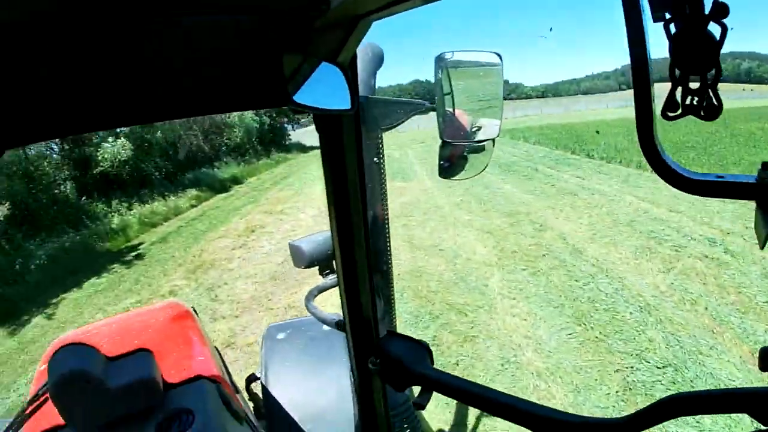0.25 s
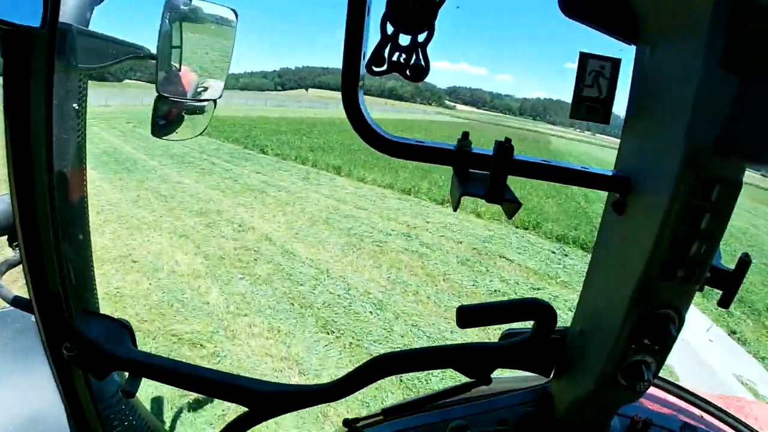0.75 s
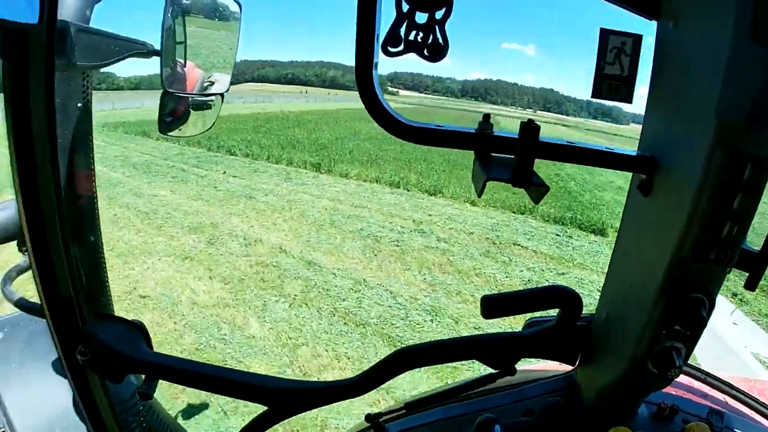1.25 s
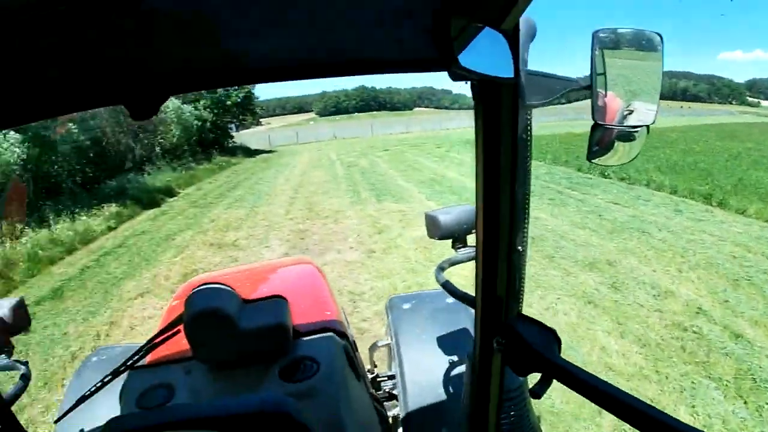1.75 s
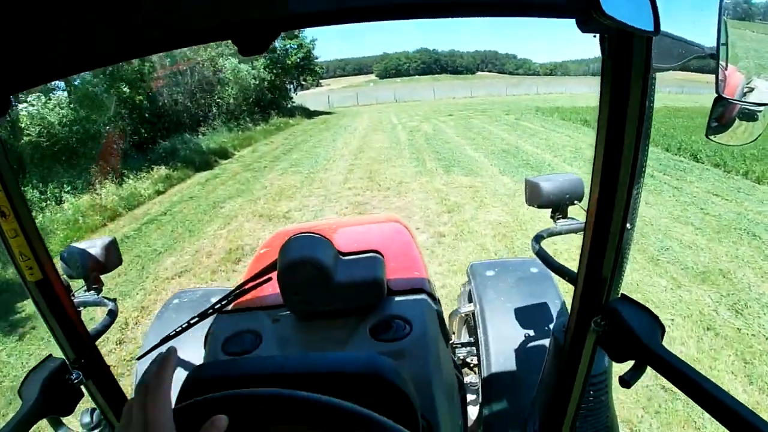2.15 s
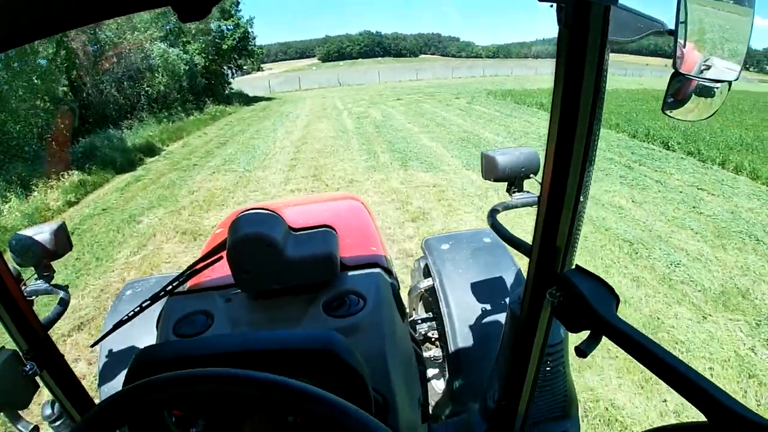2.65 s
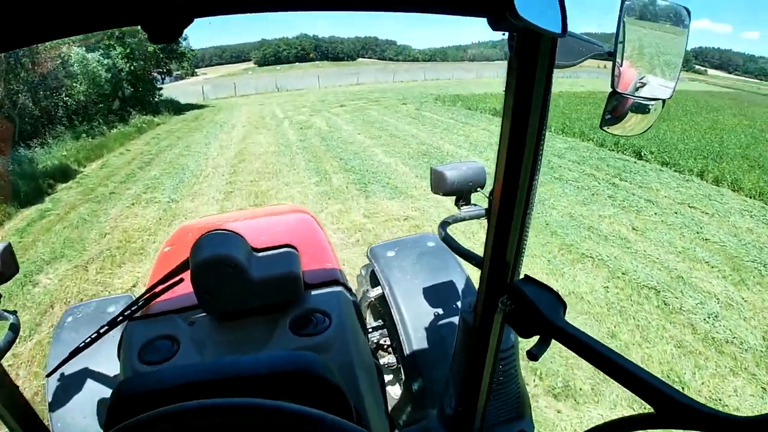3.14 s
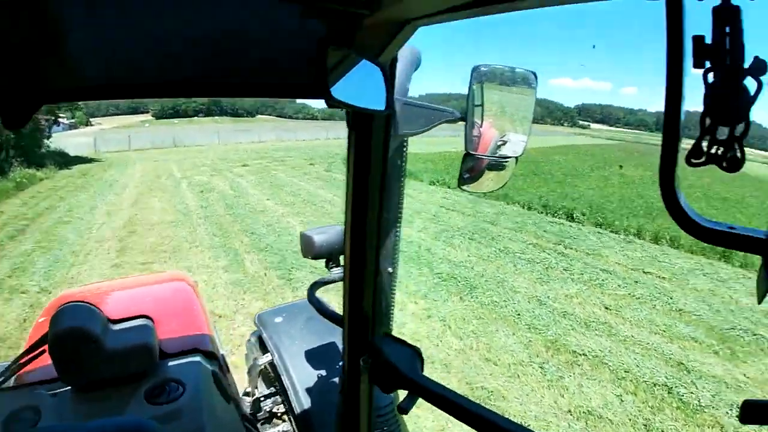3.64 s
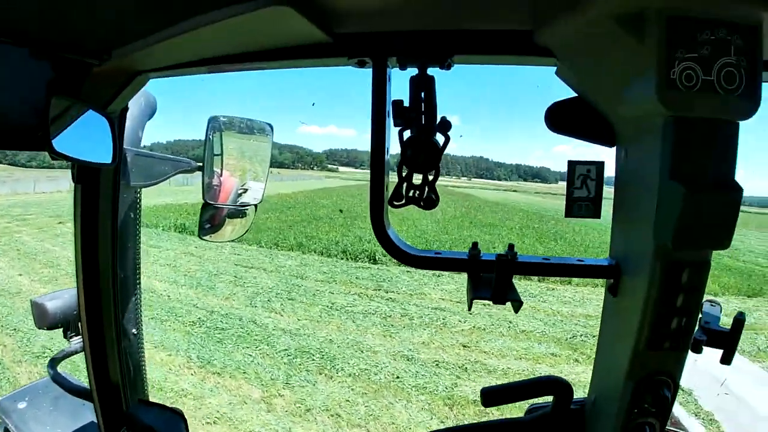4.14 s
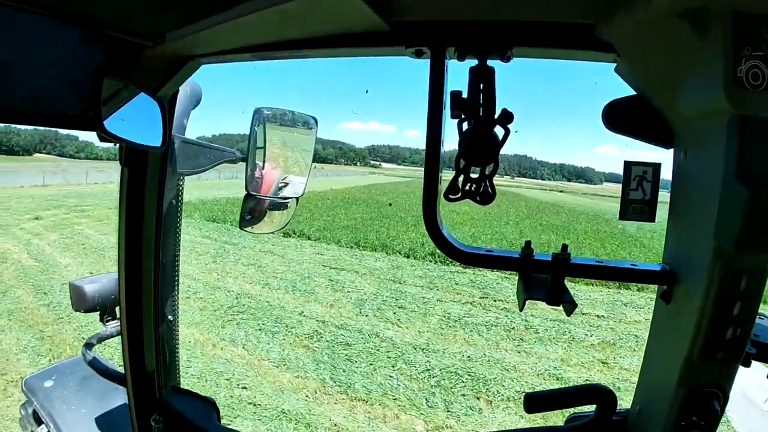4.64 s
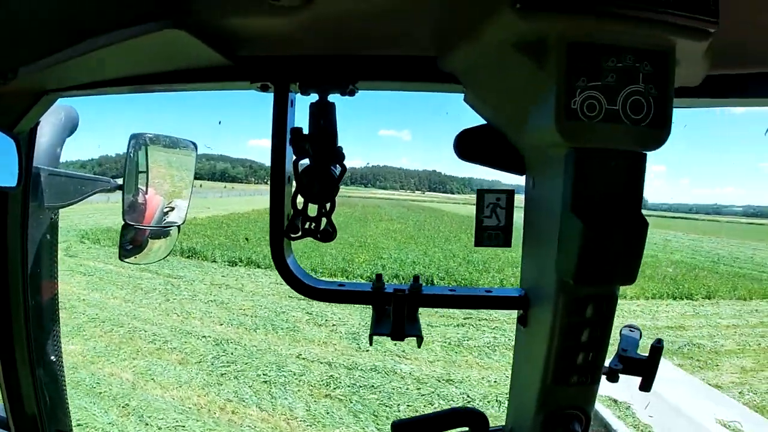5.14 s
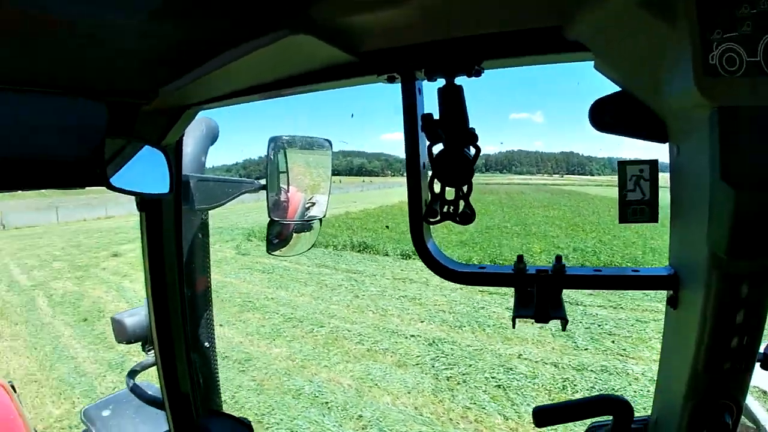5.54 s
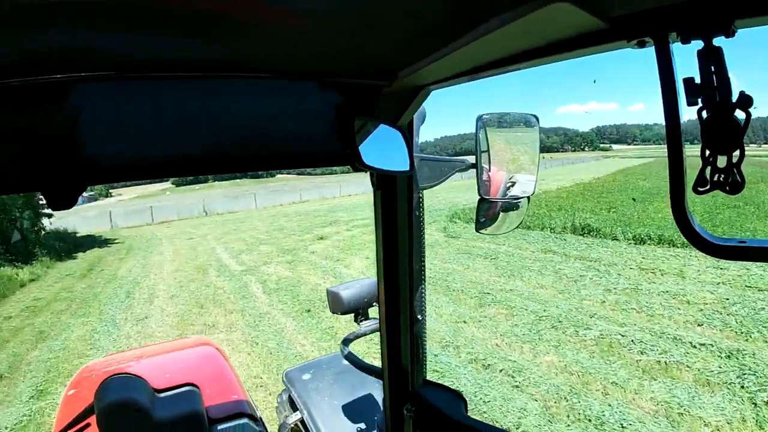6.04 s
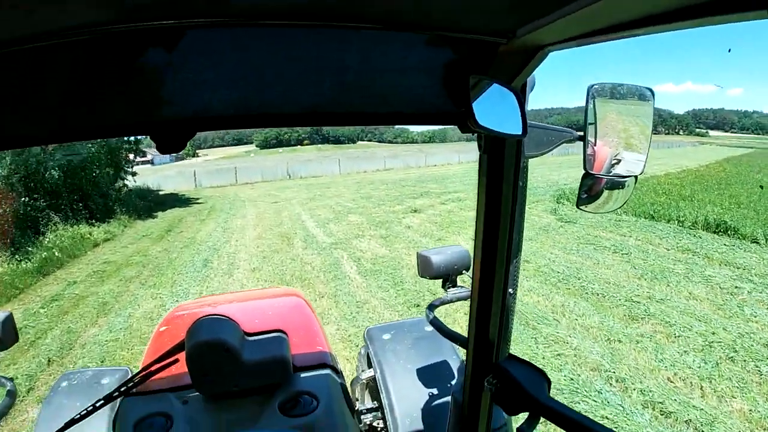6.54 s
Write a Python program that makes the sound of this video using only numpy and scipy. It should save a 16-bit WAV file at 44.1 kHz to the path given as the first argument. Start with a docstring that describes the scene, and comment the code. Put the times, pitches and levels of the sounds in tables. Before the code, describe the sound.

Inside a tractor cab, a diesel engine and mower drive make a loud, even drone with one strong low hum. The engine dips a little under load early on, then picks back up, the boom fading and swelling as the microphone turns with the driver. Underneath, the cab rumbles and shakes on rough ground, a panel buzzes now and then, and the blades hiss faintly.

```python
"""Mowing, inside a tractor cab

A six-cylinder diesel makes the cab boom at twice the firing rate and sags in thick grass, where the
mower discs hum harder. The cab shakes on its mounts and a loose panel thrums over bumps. Behind them
sit rumble, roar, combustion clatter, gear whine and blade swish. The boom and hums swell and fade
as the driver's head carries the microphone through the cab's standing waves."""
import sys
import numpy as np
from scipy import signal
from scipy.io import wavfile
from scipy.ndimage import map_coordinates

SR = 44100
rng = np.random.default_rng(int(sys.argv[2]) if len(sys.argv) > 2 else 0)


def unload_wav(signal):
    """Save mono or channel-first audio to the path in sys.argv[1] as 16-bit WAV at rate SR, clipped to [-1, 1]."""
    wavfile.write(
        sys.argv[1],
        SR,
        np.round(np.clip(np.atleast_2d(signal).T, -1, 1) * 32767).astype(np.int16),
    )


N = 299439

# the cab boom, at twice the firing rate: time_s, pitch_hz, level_db
CAB_BOOM = [(0.06, 195.2, -13.5), (0.6, 195.8, -14.5), (0.67, 194.4, -15.5), (1.25, 193.9, -15),
            (1.45, 192.8, -16), (1.94, 193.2, -18.5), (2.05, 192.5, -18.5), (2.24, 187.5, -21),
            (2.5, 187.8, -21), (2.63, 189.4, -21.5), (2.85, 192, -20), (3.02, 196.1, -18.5),
            (3.07, 197.1, -19.5), (3.43, 197.2, -20), (3.65, 195.9, -17), (4.3, 195.7, -13.5),
            (4.47, 194.6, -14), (4.67, 193.8, -13), (4.82, 191.5, -15), (4.95, 191.7, -13.5),
            (5.57, 192, -13), (5.75, 193.7, -14), (6.11, 194, -16), (6.29, 193, -18.5), (6.42, 195, -17),
            (6.74, 194.1, -18)]
# rough ground rocks the cab unevenly: time_s, shake_gain_db, sway_gain_db
GROUND = [(0, -2, -1), (.9, 1, -2), (1.4, -1, -2), (1.85, 2, 1), (2.4, -5, 1), (2.9, 3, 1), (3.5, 2, 1),
          (4.3, -1, 2), (5, -2, -2), (5.6, -3, -3), (6.3, 2, -4), (6.79, 1, -4)]
# slow gain rides on four noise layers: time_s, rumble_db, roar_db, ring_db, swish_db
RIDES = [(0, 2.5, -0.5, -1, 0.95), (.8, -1, -1.5, -2, -1.7), (1.15, 0, -1, 2, -0.5),
         (1.5, 0, -0.5, 1.9, 0.029), (1.9, 0, -1, 1.7, 0.042), (2.2, -1.5, 0.5, -1.5, -1.07),
         (2.7, 3.5, -0.5, 1.2, 0.49), (3.2, 1.5, 0, -2.5, 0.17), (3.7, 2.5, 0, 0.3, 0.2),
         (4.1, 1, 0, 0.3, 1.61), (4.9, -2.5, 0, 0.5, -0.12), (5.5, -2.5, -1.5, 1.2, -0.35),
         (5.8, 0, -0.5, -2.5, -0.73), (6.2, -2, -0.5, -2, -1.15), (6.79, -0.5, -2, -3.5, -1.76)]


def engine(firing, load, ahead):
    """A clean boom on twice the firing rate; the other harmonics waver, come and go."""
    # harmonics 4 and 7, shifting as the head moves: time_s, fourth_db, seventh_db
    hums = [(0, -43.5, -47), (.65, -47.5, -41.5), (1.15, -42, -40), (1.4, -54.5, -38.5), (1.6, -37.5, -41),
            (1.9, -35, -59.5), (2.15, -56, -40.5), (2.45, -30, -39.5), (2.75, -44.5, -40),
            (2.97, -33.5, -36.5), (3.3, -37, -49), (3.47, -44.5, -39.5), (3.65, -35.5, -43.5),
            (4.15, -55.5, -42), (4.45, -46.5, -41.5), (4.75, -34.5, -39), (5.4, -38, -39),
            (5.9, -53, -43.5), (6.2, -47.5, -41), (6.4, -41.5, -66), (6.7, -38.5, -58)]
    # other low harmonics: multiple, level_db, load_gain_db, ahead_gain_db
    low_harmonics = [(1, -44, 1, 8), (3, -47.5, 6.5, 5.5), (6, -60.5, -6.5, 0.5)]
    # faint upper harmonics: multiple, level_db
    high_harmonics = [(9, -56.5), (12, -59), (16, -58), (17, -56.5), (18, -57.5), (19, -56), (33, -62),
                      (34, -62)]
    # swells of harmonic 8: centre_s, half_length_s, level_db
    eighth_swells = [(1.25, 0.41, -41.5), (2.6, 0.29, -48), (4.752, 0.25, -40), (6.2, .2, -50.5)]
    waver_rad = .3
    sixth_swell_db = 21 * swell(centre_s=1.5, half_length_s=.46)
    fourth_db, seventh_db = curves(hums)
    lines = [(4, fourth_db), (7, seventh_db)]
    for k, db, load_db, ahead_db in low_harmonics:
        level_db = db + load_db * load + ahead_db * ahead + (k == 6) * sixth_swell_db
        lines.append((k, level_db + 2.6 * walk(7.3)))
    low = sum(tone(k * (firing + waver_rad / 2 * walk(20)), db + 2.6 * walk(12)) for k, db in lines)
    high = sum(tone(k * firing + 3 * waver_rad * walk(18), db + 4 * walk(7)) for k, db in high_harmonics)
    eighth_level = sum(undb(db) * swell(s, half) for s, half, db in eighth_swells)
    eighth = eighth_level * tone(8 * firing + 2 * waver_rad * walk(10), 0)
    boom = tone(2 * firing, curves(CAB_BOOM)[1] + .63 * walk(9))
    return boom + low + high + eighth


def mower_discs(firing, load):
    """Slightly unbalanced discs, geared to the engine, hum through the linkage, harder in thick grass."""
    # disc harmonics 1 to 3: level_db, load_gain_db
    harmonics = [(-42.5, 11), (-45.5, 15), (-42.5, 9)]
    disc = 8 / 15 * firing
    return sum(tone(k * disc, db + load_db * load + walk(2.2))
               for k, (db, load_db) in enumerate(harmonics, 1))


def cab_shake(shaft):
    """Near-infrasonic pressure: the drive shaft's throb over the cab rocking on its mounts."""
    # resonance of the mounts: frequency_hz, relative_db
    mounts = [(3, -22.5), (8, -14.5), (12, -5.5), (14, 2), (16.5, 3.5), (20, -6), (22, -24)]
    rocking = undb(-23) * textured(mounts, size=32768)
    throb = tone(shaft, -25 + 1.1 * walk(4))
    return undb(curves(GROUND)[0]) * (throb + rocking)


def loose_panel():
    """Shaking rattles a panel; over each bump it thrums, gliding to a new pitch."""
    # bumps: start_s, length_s, pitch_hz, level_db
    bumps = [(1.19, 0.14, 284, -31), (1.714, 0.26, 285.9, -34), (2.045, 0.4, 280, -33),
             (2.449, 0.43, 277.3, -35.5), (2.977, 0.12, 278.5, -30), (3.208, 0.077, 264.1, -26),
             (3.358, .14, 289.4, -33.5), (3.547, 0.24, 281.1, -31), (3.932, 0.05, 274.3, -28.5),
             (4.747, 0.15, 268.2, -29), (5.092, 0.074, 286.7, -28), (5.399, 0.075, 274.3, -27.5),
             (5.568, 0.054, 281, -28.5), (6.201, 0.083, 262.6, -25.5), (6.333, 0.088, 271, -32)]
    # panel resonance: frequency_hz, relative_db
    resonance = [(225, -40), (255, -5), (282, -1.5), (298, -6.5), (312, -43)]
    fade_s, rest_db, bump_rattle_db = .09, -41, -8
    t = np.arange(N) / SR
    push = sum(undb(db) * np.clip(np.minimum(t - s, s + length - t) / fade_s + .5, 0, 1) ** 2
               for s, length, _, db in bumps)
    pitch_hz = curves([(s + length / 2, hz) for s, length, hz, _ in bumps])[0]
    thrum = tone(turns(pitch_hz) + 1.2 * walk(22), 1.2 * walk(14))
    rattle = textured(resonance, drift_db=.5, comb_db=2, flicker_db=2, size=8192)
    return push * thrum + (undb(rest_db) + undb(bump_rattle_db) * push) * rattle


def chassis_sway():
    """Sub-bass from the chassis swaying on rough ground."""
    # sway: frequency_hz, relative_db
    spectrum = [(19, -12), (23, -6), (27, 1.5), (33, 0), (40, -9.5), (48, -27)]
    return undb(curves(GROUND)[1]) * textured(spectrum, drift_db=1, comb_db=1, flicker_db=1, size=16384)


def rumble():
    """A deep, slowly drifting rumble."""
    # rumble: frequency_hz, relative_db
    spectrum = [(36, -21), (44, 2), (52, 1), (60, 0), (78, -1.5), (88, -3.5), (105, 2), (125, 1), (170, -5),
                (225, -4), (250, -12.5), (300, -30)]
    return undb(curves(RIDES)[0]) * textured(spectrum, drift_db=1, size=8192)


def cab_cavity():
    """The air in the cab resonates with a hollow, flickering noise."""
    # cavity resonance: frequency_hz, relative_db
    spectrum = [(270, -27), (320, 0.5), (370, -2.5), (430, -2), (480, -3.5), (550, -4.5), (600, -29)]
    # slow gain ride: time_s, gain_db
    ride = [(0, 1), (.6, -2), (1.3, 2), (2, 0.5), (2.6, 0.5), (3.2, 1), (3.8, -0.5), (4.4, -0.5),
            (4.9, 3.5), (5.4, -0.5), (6, -1.5), (6.79, 0)]
    return undb(curves(ride)[0]) * textured(spectrum, drift_db=-1, comb_db=2, flicker_db=2)


def roar(firing, shaft):
    """A midrange roar that throbs faintly with the firings and the drive shaft."""
    # roar: frequency_hz, relative_db
    spectrum = [(530, -31), (590, -5.5), (630, -4.5), (670, -1), (730, -6), (890, -6.5), (1050, -11.5),
                (1300, -15), (1500, -27)]
    throb = 1 + .035 * np.cos(shaft) + .057 * np.cos(firing)
    return undb(curves(RIDES)[1]) * throb * textured(spectrum, drift_db=1, comb_db=2)


def block_ring(firing):
    """The engine block rings, pulsing faintly with the firings and surging briefly."""
    # block resonance: frequency_hz, relative_db
    spectrum = [(1300, -16.5), (1450, -2), (1520, -1.5), (1800, -1), (1950, -6.5), (2100, -26)]
    level = undb(curves(RIDES)[2] + .8 * walk(8))
    return level * (1 + .066 * np.cos(firing)) * textured(spectrum, comb_db=2.2, flicker_db=1)


def combustion_clatter(firing):
    """Bright combustion noise with a slight pulse on each firing."""
    # clatter: frequency_hz, relative_db
    spectrum = [(1700, -24), (2000, -1.5), (2400, -0.5), (2800, -5), (3300, -27.5)]
    return (1 + .038 * np.cos(firing)) * textured(spectrum, drift_db=.6, comb_db=1.83, flicker_db=.17)


def blade_swish(shaft):
    """The blades hiss, pulsing faintly with each turn of the drive shaft."""
    # swish: frequency_hz, relative_db
    spectrum = [(2300, -26.5), (2800, -6), (3100, -2.5), (3200, 1), (3400, -2), (4100, -9), (5300, -6.5),
                (6100, -11), (7000, -22), (8000, -25.5), (9000, -23.5), (9700, -26), (10800, -22),
                (12000, -24), (13300, -27), (14200, -40)]
    level = undb(curves(RIDES)[3]) * (1 + .063 * np.cos(shaft))
    return level * textured(spectrum, drift_db=.57, comb_db=1.8, flicker_db=.73)


def gear_whine():
    """The gearbox whine follows ground speed, smeared by wandering pitch and level."""
    # whine: time_s, pitch_hz, level_db
    whine = [(0, 885, -57.5), (1.0, 877, -49.5), (1.7, 866, -46.5), (2.0, 905, -45), (2.35, 915, -45.5),
             (2.9, 910, -42.5), (3.3, 918, -49), (3.65, 890, -40), (4.1, 882, -60.5), (4.65, 884, -42),
             (5.1, 880, -50.5), (6.79, 885, -46)]
    hz, db = curves(whine)
    return tone(turns(hz + 7 * walk(9)) + .8 * walk(25), db + 3.1 * walk(10))


def scratch():
    """A faint, bright double tick close to the microphone."""
    # ticks: start_s, gain_db
    ticks = [(3.105, -49), (3.119, -58)]
    decay_s = .008
    out = np.zeros(N)
    for s, db in ticks:
        age = np.maximum(np.arange(N) / SR - s, 0)
        bright_noise = np.diff(rng.standard_normal(N + 4), 4)
        out += undb(db) * (age > 0) * np.exp(-age / decay_s) * bright_noise
    return out


def rustle():
    """One brief, thin hiss high in the treble."""
    # hiss bands: centre_hz, level_db
    bands = [(8800, -63), (11000, -66), (13400, -54)]
    out = 0
    for hz, db in bands:
        bandpass = signal.butter(2, (.94 * hz, 1.06 * hz), "band", fs=SR, output="sos")
        band = signal.sosfilt(bandpass, rng.standard_normal(N))
        out += undb(db) * band / np.std(band)
    return swell(centre_s=1.63, half_length_s=.1) * out


def noise_bed(firing, shaft, load, ahead):
    """Mixes the broad noises, rebalanced by engine load and head direction."""
    # one row a layer, in the order below: level_db, load_gain_db, ahead_gain_db
    faders = [(-31, -0.5, 5.5), (-27.5, 4, -2.5), (-42, 2, 2), (-36, 0.5, -0.5), (-43, 1, 1), (-48, -1, 3),
              (-46.5, 0.5, 2)]
    layers = (chassis_sway(), rumble(), cab_cavity(), roar(firing, shaft),
              block_ring(firing), combustion_clatter(firing), blade_swish(shaft))
    return sum(undb(db + load_db * load + ahead_db * ahead) * layer
               for (db, load_db, ahead_db), layer in zip(faders, layers))


def undb(db):
    return 10 ** (np.asarray(db) / 20)


def curves(table):
    """Each column after time_s as a curve, one value a sample."""
    s, *columns = np.transpose(table)
    return [np.interp(np.arange(N) / SR, s, c) for c in columns]


def swell(centre_s, half_length_s):
    """A bell-shaped envelope peaking at 1."""
    return np.exp(-((np.arange(N) / SR - centre_s) / half_length_s) ** 2)


def turns(hz):
    """Running phase in radians."""
    return 2 * np.pi * (np.cumsum(hz) / SR + rng.random())


def tone(phase, db):
    """Sine of the given rms level."""
    return np.sqrt(2) * undb(db) * np.sin(phase + 2 * np.pi * rng.random())


def walk(rate):
    """Smooth random wander, a new value every 1 / rate s; spread near 1."""
    place = np.arange(N) * rate / SR
    place = np.floor(place) + np.sin(np.pi / 2 * (place % 1)) ** 2
    count = int(place[-1]) + 2
    return 1.02 * np.interp(place, np.arange(count), rng.standard_normal(count))


def patches(across, along):
    """A smooth random field of spread near 1, one new value per unit of each axis."""
    seeds = rng.standard_normal((int(across.max()) + 2, int(along.max()) + 2))
    return 1.5 * map_coordinates(seeds, np.meshgrid(across, along, indexing="ij"), order=1)


def textured(spectrum, drift_db=0, comb_db=0, flicker_db=0, size=2048):
    """Shaped noise, rms 1, with drifting, flickering bands and a shifting comb of standing-wave peaks."""
    f, s, white = signal.stft(rng.standard_normal(N), SR, nperseg=size)
    hz, db = np.transpose(spectrum)
    inside = (f >= hz[0]) & (f <= hz[-1])
    f = f[inside]
    octave = np.log2(f + 10)
    shape = np.interp(octave, np.log2(hz + 10), db)[:, None]
    drift = drift_db * patches(4 * octave, 1.18 * s)
    flicker = flicker_db * patches(3 * octave, 12 * s)
    comb = comb_db * patches(f / 60, 4 * s)
    coloured = np.zeros_like(white)
    coloured[inside] = white[inside] * undb(shape + drift + flicker + comb)
    out = signal.istft(coloured, SR, nperseg=size)[1][:N]
    return out / np.std(out)


def scene():
    """The boom's pitch sets engine speed and load; its level stands for head direction."""
    free_hz, loaded_hz = 194, 187.5  # boom unloaded and in thick grass
    side_db, ahead_db = -13.5, -21  # boom with the head turned aside and facing ahead
    boom_hz, boom_db = curves(CAB_BOOM)
    load = np.clip((free_hz - boom_hz) / (free_hz - loaded_hz), 0, 1)
    ahead = np.clip((boom_db - side_db) / (ahead_db - side_db), 0, 1)
    firing = turns(boom_hz / 2)
    shaft = .187 * firing  # phase of the mower's drive shaft
    tones = engine(firing, load, ahead) + mower_discs(firing, load) + gear_whine()
    bed = noise_bed(firing, shaft, load, ahead)
    return (tones + bed + cab_shake(shaft) + loose_panel() + scratch() + rustle())[None]


def record(dry):
    """Only the loudest peaks are rounded, and the housed microphone loses the top."""
    ceiling, housing_hz, cutoff_hz = .57, 7014, 14200
    rounded = dry / (1 + (dry / ceiling) ** 6) ** (1 / 6)
    dull = signal.sosfilt(signal.butter(4, housing_hz, fs=SR, output="sos"), rounded)
    return signal.sosfilt(signal.ellip(8, .2, 60, cutoff_hz, fs=SR, output="sos"), dull)


dry = scene()
out = record(dry)
unload_wav(out)
```